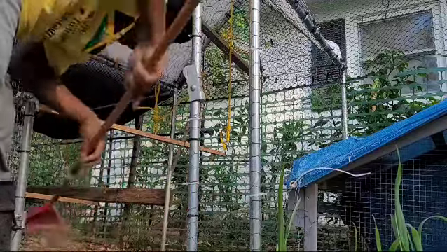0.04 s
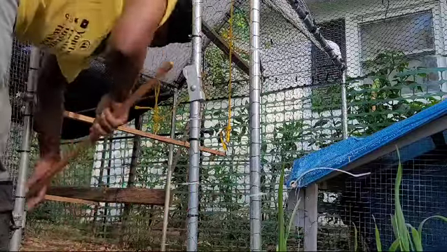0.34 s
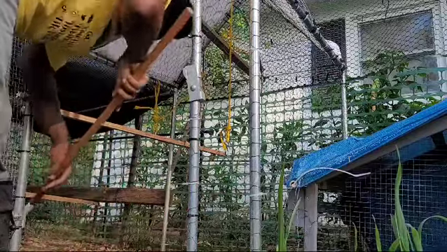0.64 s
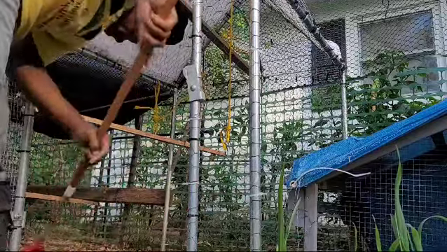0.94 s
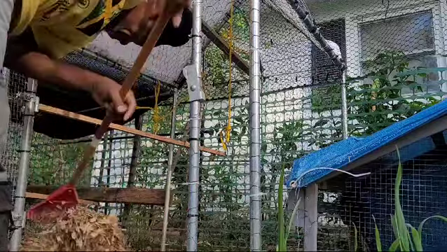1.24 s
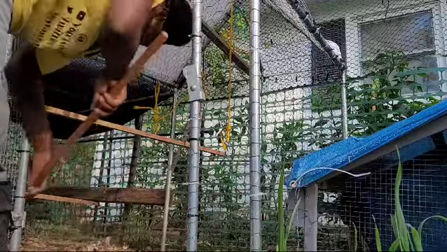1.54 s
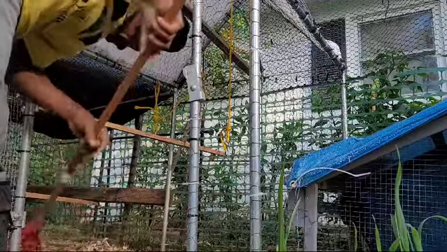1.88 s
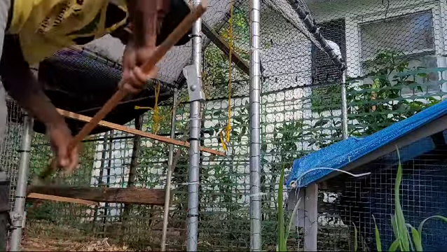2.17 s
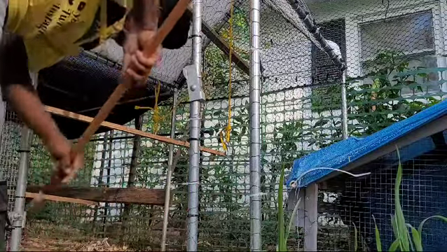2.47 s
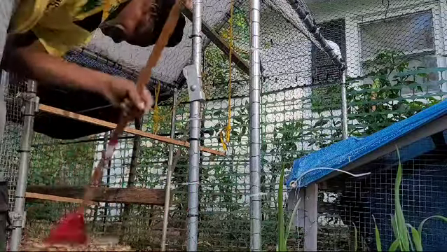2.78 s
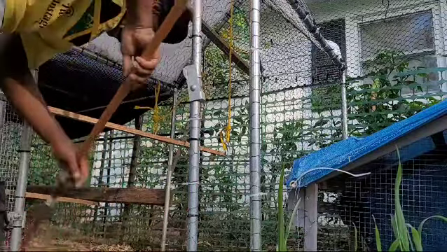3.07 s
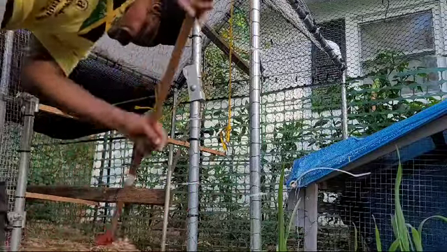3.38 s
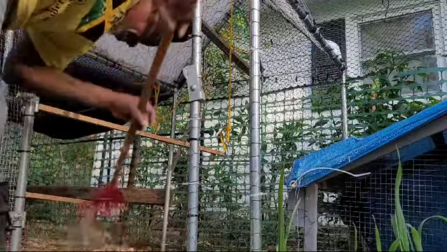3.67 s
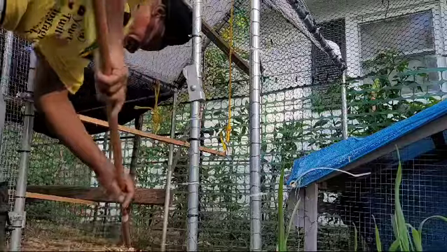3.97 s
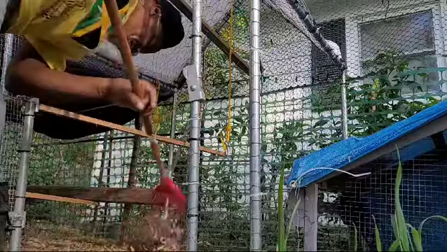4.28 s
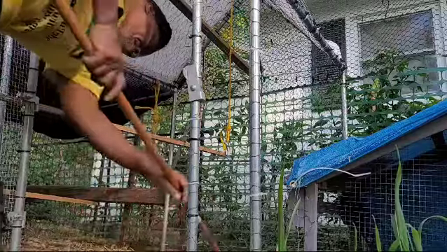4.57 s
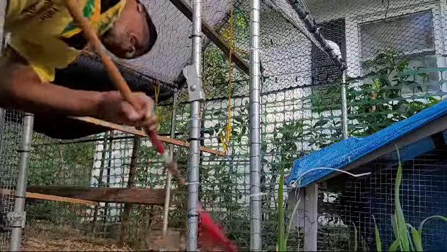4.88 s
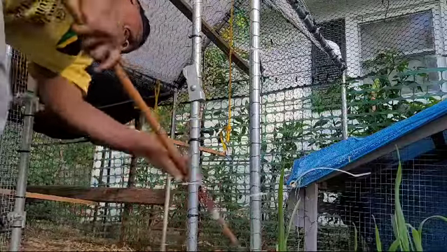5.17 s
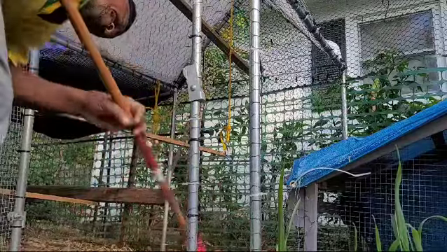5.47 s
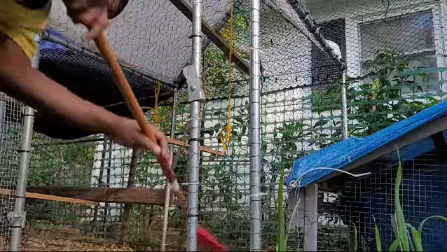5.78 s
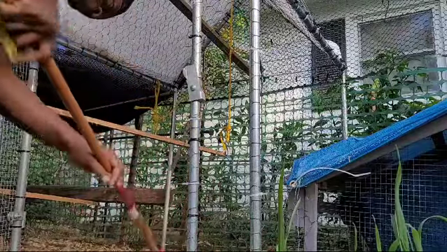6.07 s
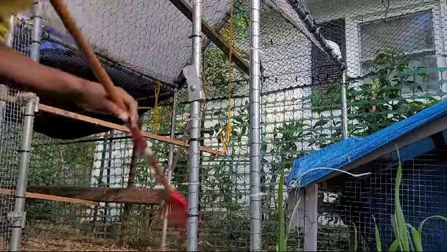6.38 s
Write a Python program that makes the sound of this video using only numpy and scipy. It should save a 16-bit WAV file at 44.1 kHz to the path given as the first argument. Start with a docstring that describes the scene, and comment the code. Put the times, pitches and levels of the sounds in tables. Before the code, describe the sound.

A plastic rake scrapes dry litter across an earth floor in short crunching strokes, with snaps and knocks over a low distant traffic rumble.

```python
"""Raking out a coop

Close by, a plastic rake pulls dry litter across the earth floor of a wire-mesh coop. Its head lands with
a knock, the tines drag through crunching, snapping chips, and flicked chaff patters down.
Behind it distant traffic rumbles, one engine slowly sinks in pitch, a bird gives one short hollow note,
and three faint, very high squeaks come and go."""
import sys
import numpy as np
from scipy import signal
from scipy.fft import rfft, irfft
from scipy.io import wavfile

SR = 44100
rng = np.random.default_rng(int(sys.argv[2]) if len(sys.argv) > 2 else 0)


def master(y):
    """Save y as 16-bit WAV."""
    cut = np.clip(np.atleast_2d(y).T, -1, 1)
    pcm = np.round(cut * 32767)  # scale
    wavfile.write(sys.argv[1], SR, pcm.astype(np.int16))


N = 292455
TIME = np.arange(N) / SR

# Pulls of the rake (start [s], rise [s], hold [s], swell [dB], chip crunch [dB], grit [dB], judder [dB],
# hollow pitch [Hz], hollow hum [dB], tine rasp [Hz], rasp lift [dB], spread of chip sizes [dB])
STROKES = [ (0.945, 0.016, 0.019, 10, -47, -52, -48, 700, -53, 3000, 0, 5),
           (2.521, 0.048, 0.041, 3, -43.5, -57, -59, 760, -49, 3020, 6, 4.5),
           (2.64, 0.046, 0.021, 14, -42.5, -54, -46, 625, -45, 2800, -8, 2),
           (3.21, 0.094, 0.09, 20.5, -27.8, -33, -45, 816, -37.5, 3150, 5.5, 2),
           (3.923, 0.033, 0.01, 19, -55, -36, -38, 866, -45, 3000, 1, 2.5),
           (4.0, 0.078, 0.044, 14, -35, -29, -28.5, 400, -42, 1470, 8, 3.5),
           (4.67, 0.079, 0.039, 21, -33.5, -29.5, -31.5, 520, -30, 2680, -1, 4),
           (5.262, 0.019, 0.022, 15, -33.5, -34, -32, 750, -41, 2380, 9, 1.5),
           (5.319, 0.085, 0.034, 8.5, -28.5, -32, -32.5, 710, -36.5, 2080, 1.5, 4),
           (5.929, 0.032, 0.021, 12, -40.5, -45, -41.5, 577, -51, 1630, 8, 5),
           (6.023, 0.08, 0.039, 14, -38, -35, -34.5, 745, -36.5, 2600, 1, 4.5), ]
# Tone of crushed chips, grit under the tines and the juddering head (frequency [Hz], level [dB])
CRUNCH_EQ = [(900, -24.5), (1600, 1.5), (2300, -1), (3000, 2), (3800, 0), (5200, -4.5), (6700, -17.5),
             (7800, -18.5), (10000, -16), (16000, -23)]
GRIT_EQ = [(350, -19.5), (600, -3), (800, -2), (1000, -0.5), (1270, -14), (1600, -3), (2000, -16.5),
           (3000, -9.5), (6000, -69)]
JUDDER_EQ = [(60, -21), (120, 3.5), (200, 7.5), (300, 0), (450, 6), (580, -6.5), (900, -61), (2000, -32.5)]
# Resonances of the rake's plastic fan (frequency [Hz], width [Hz], lift [dB])
FAN_MODES = [(394, 25, -0.5), (755, 57, 7.5), (1120, 57, 8), (1430, 250, 5.5), (1970, 140, 4.5),
             (2830, 63, 5), (3250, 220, 1.5), (4190, 210, 2), (6600, 770, 10.5)]
# Tines and chips snapping (time [s], level [dB], body [dB], brightness [dB], ring [Hz], ring lift [dB],
# ring width [share of its pitch], t60 [s], first crack against the splinters [dB])
SNAPS = [ (0.2993, -18.5, -5, -50, 3650, 17, .22, 0.011, 0), (.36, -39, -20, 10, 6000, 0, .2, .01, 0),
         (.386, -31.5, 3, -42, 3500, 11, .2, .015, 1), (.5085, -25.5, -19, -23, 2620, 6, .3, 0.026, 0),
         (.5145, -28, -13, -8, 2300, 10, .2, .012, -2), (0.7586, -16, -2, 7, 3500, 4.5, .6, 0.0082, -1),
         (1.6226, -35, -6, -13, 5000, -1, .2, .024, -1.5), (1.8294, -17, -16, -15, 3100, 0, 0.24, 0.012, 1),
         (1.835, -24, -16, -2, 4200, 3, .3, .012, 0), (2.43, -18, 16, -24, 2920, 18.5, .2, 0.012, 1),
         (2.4906, -33, -1, -25, 2970, 9, .2, 0.12, 1), (2.612, -22.5, 12, -32, 2320, 10, 0.18, .02, 3),
         (3.136, -35, -12, -14, 4500, 7, .3, 0.0086, 0), (3.1787, -10, -11, -25, 1600, 14, .4, 0.0085, 1.5),
         (3.185, -27, 1, -22, 5600, 8, .3, .07, -4), (3.214, -23, 0, -24, 1700, 8, .3, .006, -2),
         (3.323, -21, -8, -24, 4000, 7, .3, .01, 2), (3.387, -22, -6, -20, 3100, 5, .3, .006, 4),
         (3.4, -14, 5, -24, 1600, 11, .3, 0.012, 2), (4.061, -16, 11, -15, 1430, 6, .3, 0.022, -2),
         (4.095, -17, 7, -24, 1550, 10, .4, .018, 5), (4.126, -24, 2, -22, 1450, 10, .25, .014, -1),
         (4.444, -50, -12, 8, 4000, 0, .2, .015, -1.5), (4.627, -19.5, 5, -9.5, 2560, 13.5, 0.34, 0.033, 1),
         (4.638, -28.5, 5, -10, 2700, 8, .25, 0.038, 2), (5.096, -34.5, -12, 8, 4000, 2, .2, .035, -1.5),
         (5.136, -32, -22, -19, 3140, 13, .2, .029, -1.5),
         (5.163, -32, -16, -3, 6700, 4, 0.19, 0.033, -1.5),
         (5.26, -21.5, 0, -24, 2180, 14, .2, 0.015, -1.5), (5.274, -17.5, -7, -6, 2530, 8, .2, 0.01, 0),
         (5.297, -15, -2, -24, 2300, 15, .3, .008, -3), (5.363, -15, -2, -22, 2200, 16, .3, 0.009, 0),
         (5.398, -16.5, 15, 2, 746, 11, 0.22, 0.028, -3),
         (5.4374, -11.5, 1, -25, 3370, 9, 0.27, 0.013, 2.5), (5.755, -35, -20, 12, 6000, 0, .2, .01, 0),
         (5.77, -33, -20, 12, 6000, 0, .2, .008, 0), (5.938, -24.5, 5, -39, 2890, 8, 0.22, 0.011, 5),
         (5.988, -34, -12, 0, 4000, 0, .2, .008, 0), (6.0026, -24, -8, -34, 2400, 8, .5, .011, 1),
         (6.128, -23.5, -14, -47, 3080, 9, .25, 0.015, 1), (6.282, -41, -20, 8, 6000, 0, .2, .008, 0),
         (6.607, -34, 9, -40, 2860, 8, .2, 0.0085, 2), ]
# The rake head landing or bumping on the earth (time [s], level [dB], muffling [dB/octave])
KNOCKS = [(3.183, -30, 4), (3.9643, -18, 2.5), (3.981, -28.5, 4), (4.076, -26, 0), (4.63, -6.5, 0),
          (4.782, -26, 0), (5.262, -26.5, 6.5), (5.281, -26.5, 4), (5.343, -20, 2), (5.385, -22, 3),
          (5.399, -21, 0), (5.964, -24, 2)]
# Ring of the rake head (frequency [Hz], level [dB], t60 [s])
HEAD_MODES = [(166, -5, 0.054), (245.5, -8, 0.062), (481, -6, 0.027), (727, -4.5, 0.025), (910, -11, 0.039)]
# Showers of loose chaff (thickest moment [s], rise [s], fall [s], level [dB])
SHOWERS = [ (.358, 0.068, 0.035, -48), (0.518, 0.0088, .06, -40.5), (.58, 0.057, 0.035, -46),
           (.77, 0.0074, 0.071, -48), (1.001, 0.14, 0.39, -51), (1.49, 0.38, .3, -52.5),
           (1.624, 0.019, 0.044, -44.5), (1.769, 0.16, 0.19, -56.5), (1.841, 0.012, 0.09, -40),
           (2.497, 0.04, 0.075, -41), (2.69, 0.22, 0.19, -45.5), (3.182, 0.024, 0.055, -39.5),
           (3.261, 0.038, 0.2, -36), (3.76, 0.25, 0.13, -65), (4.12, 0.11, .13, -46.5),
           (4.54, 0.17, 0.2, -59.5), (4.755, 0.14, 0.11, -36.5), (5.14, 0.13, 0.067, -40.5),
           (5.172, 0.025, 0.085, -46), (5.62, 0.26, 0.14, -57.5), (5.765, 0.044, 0.077, -44.5),
           (5.96, 0.16, 0.083, -46.5), (6.11, .1, 0.14, -49), (6.281, 0.062, 0.042, -51),
           (6.39, 0.069, 0.17, -41.5), (6.509, 0.084, 0.085, -41.5), ]
# Tone of falling chaff (frequency [Hz], level [dB])
CHAFF_EQ = [(800, -10), (2000, 10.5), (3200, 7.5), (6300, 3), (8500, 1.5), (10000, -4.5), (12500, 1.5),
            (16000, 1.5)]
# Tone of road rumble, engine drone and tyre wash (frequency [Hz], level [dB])
RUMBLE_EQ = [(12, -10), (28, -25), (44, -0.5), (62, 4), (90, 1.5), (140, -3), (180, -2), (225, -9.5),
             (280, -20), (600, -55.5)]
DRONE_EQ = [(130, -26.5), (220, 4), (300, -4.5), (380, 1.5), (500, -7), (700, 1), (1500, -69.5)]
TYRE_EQ = [(250, -24.5), (500, -5.5), (690, -1), (850, 2), (1250, -6.5), (1550, -3), (2300, -11),
           (3200, -15.5), (4200, -19), (6700, -24.5), (8000, -35.5), (9600, -55), (12000, -40),
           (16000, -46)]
# Stereo image of the traffic (frequency [Hz], left-right likeness [-1 to 1])
TRAFFIC_LIKENESS = [(60, 1), (130, 0.84), (290, 0.78), (640, 0.27), (1400, -0.31), (3100, 0.16),
                    (15000, -0.27)]
# Firing note of one far engine (time [s], pitch [Hz], level [dB])
ENGINE_NOTE = [(0, 120, -67), (1.35, 117.5, -47), (1.6, 114, -36), (2.3, 109.5, -37), (2.62, 108, -49.5),
               (3.4, 95.6, -37), (3.72, 90, -42), (4.701, 88, -43.5), (6.63, 88, -51)]
# Thin high squeaks (time [s], pitch [Hz], level [dB])
SQUEAKS = [(1.08, 12350, -47.5), (2.17, 12220, -58), (3.565, 12400, -63)]
# Colour of the two microphone ports (frequency [Hz], left minus right [dB])
PORT_BALANCE = [(60, -0.5), (99, -1), (160, -1), (270, -1), (450, -1), (740, 3.5), (1220, 1), (2010, 2),
                (3330, 2), (5500, -1.5), (9080, 1.5), (15000, 2)]


def strokes():
    """Tines crush chips and rub the earth, catching and slipping; the fan judders over a humming hollow."""
    lift_db_per_s, flick_db = 384, 15
    settle_db, settle_db_per_s, settle_s = -15.5, 132, .25
    sag_hz_per_s, hollow_wander = 930, .038
    out, catching, shifting = np.zeros((2, N)), drift(top_hz=100), drift(top_hz=60)
    for (s, rise_s, hold_s, swell_db, crunch_db, grit_db, judder_db,
         hollow_hz, hum_db, rasp_hz, rasp_db, spread_db) in STROKES:
        t = np.arange(round((rise_s + hold_s + settle_s) * SR)) / SR
        to_go = np.maximum(1 - t / rise_s, 0) ** 1.3  # the pull gathers speed quickly, then levels off
        lifted_s = np.maximum(t - rise_s - hold_s, 0)
        catch_db = .35 * np.interp(s + t, TIME, catching)
        pull = amp(catch_db - swell_db * to_go) * signal.windows.tukey(len(t), .03)
        grip = pull * amp(-lift_db_per_s * lifted_s)  # the scrape dies as the rake lifts
        settling = pull * amp(settle_db - settle_db_per_s * lifted_s)  # the chips move on after it
        chips = grains(len(t), per_s=4000, spread_db=spread_db, grain_s=.0003)
        crunch = np.maximum(grip, settling) * amp(crunch_db) * chips
        chip_eq = ringing(CRUNCH_EQ, FAN_MODES + [(rasp_hz, .3 * rasp_hz, rasp_db)])
        add(out, s, crackle(crunch, chip_eq, wet_db=-1, t60=.028))
        # now and then one tine flicks free with a hard click
        flicks = (rng.random(len(t)) < 45 / SR) * rng.uniform(.5, 1, len(t))
        clicks = equalise(flicks * grip * amp(crunch_db + flick_db), chip_eq)
        add(out, s, coop(clicks, wet_db=-4, t60=.03))
        grit = grip * amp(grit_db) * grains(len(t), per_s=3000, spread_db=.5, grain_s=.00027)
        add(out, s, crackle(grit, ringing(GRIT_EQ, FAN_MODES), wet_db=-.5, t60=.012))
        add(out, s, crackle(grip * amp(judder_db), ringing(JUDDER_EQ, FAN_MODES), wet_db=-26, t60=.035))
        # the hollow under the rake sinks in pitch during a pull and wanders as the litter shifts
        hum_hz = hollow_hz - sag_hz_per_s * (t - lifted_s - rise_s - hold_s / 2)
        hum_hz *= 1 + hollow_wander * np.interp(s + t, TIME, shifting)
        hum = resonate(rng.standard_normal(len(t)), hum_hz, width_hz=117)
        hum = unit_rms(resonate(hum, hum_hz, width_hz=190))
        add(out, s, coop(grip * amp(hum_db) * hum, wet_db=-2, t60=.036))
    return out


def snaps():
    """A hard crack with a short splintering tail, coloured by the tine or chip that makes it."""
    rise_s, overtone_ratio = .00068, 1.4
    out, t = np.zeros((2, N)), np.arange(SR // 8) / SR
    for s, db, body_db, bright_db, hz, ring_db, width, t60, crack_db in SNAPS:
        tilt = [(150, body_db - 6.5), (800, body_db + 6), (1500, body_db / 2 + 6), (2900, 0),
                (6600, bright_db / 4), (8500, bright_db / 2 - 5.5), (12000, bright_db),
                (16000, bright_db - 3.5)]
        eq = ringing(tilt, [(hz, hz * width, ring_db), (hz * overtone_ratio, hz * width, .31 * ring_db)])
        splinters = amp(db - 60 * t / t60) * (1 - np.exp(-t / rise_s))
        add(out, s, crackle(splinters, eq, wet_db=4, t60=.05))
        crack = equalise(signal.unit_impulse(len(t)), eq)
        add(out, s + .0007, coop(amp(db + crack_db) * crack / abs(crack).max(), wet_db=-8, t60=.03))
    return out


def knocks():
    """The rake head lands softly and rings for a few cycles; deep litter muffles its higher modes."""
    out, t = np.zeros((2, N)), np.arange(SR // 6) / SR
    for s, db, muffling in KNOCKS:
        ring = np.zeros(len(t))
        for k, (hz, mode_db, t60) in enumerate(HEAD_MODES):
            octaves = np.log2(hz / HEAD_MODES[0][0])
            decay = amp(mode_db - muffling * octaves - 60 * t / t60)
            ring += (-1) ** k * decay * np.sin(2 * np.pi * hz * t)
        ring *= 1 - np.exp(-t / .0015)  # soft attack
        add(out, s, coop(amp(db) * ring / abs(ring).max(), wet_db=-9, t60=.36))
    return out


def showers():
    """Light chaff slides and patters down in clumps: a fine bright rustle that thickens and thins out."""
    out, clumps_db = np.zeros((2, N)), -drift(top_hz=84)
    for s, rise_s, fall_s, db in SHOWERS:
        t = np.arange(-round(rise_s * SR), round(2 * fall_s * SR)) / SR
        thinning_db = 20.5 * np.maximum(-t / rise_s, t / fall_s)
        patter = grains(len(t), per_s=1100, spread_db=4.4, grain_s=.0003)
        patter *= amp(db - thinning_db + np.interp(s + t, TIME, clumps_db))
        add(out, s - rise_s, crackle(patter, CHAFF_EQ, wet_db=3, t60=.04))
    return out


def traffic():
    """Far roads: a lumpy centred rumble, engine drone and a wide tyre wash, each swelling as cars pass."""
    likeness = read(TRAFFIC_LIKENESS, np.fft.rfftfreq(N, 1 / SR))

    def bed(eq, waver_db, steady_db, near_db, near_s, pass_s):
        """Wavering stereo noise: a steady floor plus a vehicle that draws near and recedes."""
        mid, side = rfft(rng.standard_normal((2, N))) * np.sqrt([1 + likeness, 1 - likeness])
        noise = unit_rms(equalise(irfft([mid + side, mid - side], N), eq))
        vehicle_power = amp(near_db) ** 2 / (1 + ((TIME - near_s) / pass_s) ** 2)
        return noise * amp(waver_db * drift(top_hz=9.1)) * np.sqrt(amp(steady_db) ** 2 + vehicle_power)

    rumble = bed(RUMBLE_EQ, waver_db=1.73, steady_db=-39, near_db=-38, near_s=1.82, pass_s=.9)
    drone = bed(DRONE_EQ, waver_db=1.4, steady_db=-52, near_db=-42.5, near_s=.52, pass_s=.62)
    tyres = bed(TYRE_EQ, waver_db=.3, steady_db=-45.5, near_db=-41.5, near_s=1.54, pass_s=1.65)
    return rumble + drone + tyres


def engine():
    """The firing note of a far engine wavers, fades in and out, and sinks."""
    s, hz, db = np.transpose(ENGINE_NOTE)
    firing_hz = np.interp(TIME, s, hz) * (1 + .024 * drift(top_hz=14))
    phase = 2 * np.pi * np.cumsum(firing_hz) / SR
    tone = np.sin(phase) + amp(-20.5) * np.sin(2 * phase)
    fading_db = 3.4 * drift(top_hz=18)
    return unit_rms(tone) * amp(np.interp(TIME, s, db) + fading_db)


def bird():
    """One short, nearly pure note that rises a little."""
    start_s, hz, db, glide_hz_per_s = 4.984, 717, -32, 300
    attack_s, fade_from_s, fade_db_per_s = .0071, .021, 850
    out, t = np.zeros((2, N)), np.arange(SR // 12) / SR
    envelope = np.minimum(t / attack_s, 1) * amp(db - fade_db_per_s * np.maximum(t - fade_from_s, 0))
    tone = unit_rms(np.sin(2 * np.pi * np.cumsum(hz + glide_hz_per_s * t) / SR))
    add(out, start_s, coop(envelope * tone, wet_db=-21, t60=.15))
    return out


def squeaks():
    """Faint, very high pips, each a brief swell."""
    out, t = np.zeros((2, N)), np.arange(SR // 25) / SR
    for s, hz, db in SQUEAKS:
        pip = amp(db) * np.sin(2 * np.pi * hz * t) * np.hanning(len(t))
        add(out, s - t[-1] / 2, np.array([pip, pip]))
    return out


def grains(length, per_s, spread_db, grain_s):
    """Envelope of many tiny fractures of uneven size, each dying away with time constant grain_s."""
    power = amp(2 * spread_db * np.minimum(rng.exponential(1, length), 4))
    breaks = rng.random(length) < per_s / SR
    return unit_rms(np.sqrt(signal.lfilter([1], [1, -np.exp(-1 / (grain_s * SR))], power * breaks)))


def crackle(envelope, eq, wet_db, t60, lead_s=.00017, bounce=.44):
    """Noise bursts reach the left port first, with a floor bounce and a short diffuse tail."""
    envelope = np.pad(envelope, (0, SR // 8))
    direct = envelope * rng.standard_normal(len(envelope))
    decay = amp(-120 / (t60 * SR))  # power left after each sample
    tail_power = signal.lfilter([1 - decay], [1, -decay], envelope ** 2)
    tail = np.sqrt(tail_power) * rng.standard_normal((2, len(envelope)))
    pair = np.array([direct, np.roll(direct, round(lead_s * SR))]) + amp(wet_db) * tail
    pair = np.array([port + bounce * np.roll(port, rng.integers(SR // 800, SR // 250)) for port in pair])
    eq_power = np.mean(amp(2 * read(eq, np.fft.rfftfreq(4096, 1 / SR))))
    return equalise(pair, eq) / np.sqrt(eq_power * (1 + amp(2 * wet_db)) * (1 + bounce ** 2))


def coop(x, wet_db, t60, lead_s=.00023):
    """Sound from the floor reaches the left port first; posts, boards and roof scatter it briefly."""
    t = np.arange(SR // 4) / SR
    taps = rng.standard_normal((2, len(t))) * (rng.random((2, len(t))) < .1) * amp(-60 * t / t60)
    taps *= amp(wet_db) / np.linalg.norm(taps, axis=1, keepdims=True)
    taps[0, 0] += 1
    taps[1, round(lead_s * SR)] += 1
    return signal.fftconvolve(x[None], taps, axes=1) / np.sqrt(1 + amp(2 * wet_db))


def ringing(eq, modes):
    """An EQ curve with resonant bells added (frequency [Hz], width [Hz], lift [dB])."""
    f = np.geomspace(40, SR / 2, num=400)
    lift = sum(db / (1 + (2 * (f - hz) / width) ** 2) for hz, width, db in modes)
    return np.transpose([f, read(eq, f) + lift])


def resonate(x, hz, width_hz):
    """A unity-gain resonance swept along the curve hz."""
    carrier = np.exp(2j * np.pi * np.cumsum(hz) / SR)
    pole = np.exp(-np.pi * width_hz / SR)
    return 2 * (carrier * signal.lfilter([1 - pole], [1, -pole], x / carrier)).real


def equalise(x, eq, size=4096):
    """Minimum-phase filter shaped by an EQ curve."""
    gain_db = np.maximum(read(eq, abs(np.fft.fftfreq(size, 1 / SR))), -100)
    response = np.exp(np.conj(signal.hilbert(np.log(amp(gain_db)))))
    taps = np.fft.ifft(response).real
    return np.apply_along_axis(lambda v: signal.oaconvolve(v, taps)[:len(v)], -1, x)


def drift(top_hz):
    """Random wobble of rms 1, at rates from a tenth of top_hz up to top_hz."""
    t = np.linspace(0, N / SR, num=2000)
    rates = np.geomspace(top_hz / 10, top_hz, num=20)
    waves = sum(np.sin(2 * np.pi * (hz * t + rng.random())) / np.sqrt(hz) for hz in rates)
    return np.interp(TIME, t, unit_rms(waves))


def read(curve, hz):
    """A curve's value at hz, on a log-frequency axis."""
    f, value = np.transpose(curve)
    return np.interp(np.log(hz + 1), np.log(f + 1), value)


def amp(db):
    """Decibels to gain."""
    return 10 ** (np.asarray(db) / 20)


def unit_rms(x):
    """Scales to rms 1."""
    return x / np.sqrt(np.mean(x ** 2) + 1e-20)


def add(mix, s, sound):
    """Lays a stereo sound into the mix at s seconds."""
    part = mix[:, max(round(s * SR), 0):][:, :sound.shape[1]]
    part += sound[:, :part.shape[1]]


def scene():
    """The raking up front, the outdoor bed behind it."""
    rake = (strokes() + snaps() + knocks()) * amp([[.3], [-.3]])  # a little to the left
    return rake + showers() + traffic() + engine() + bird() + squeaks()


def record(dry):
    """Each microphone port adds its own colour, and a steep low-pass trims the very top."""
    lean_db = read(PORT_BALANCE, np.fft.rfftfreq(N, 1 / SR)) / 2
    coloured = irfft(rfft(dry) * amp([lean_db, -lean_db]), N)
    low_pass = signal.firwin(511, cutoff=15950, window=("kaiser", 9), fs=SR)
    return signal.oaconvolve(coloured, low_pass[None], "same")


dry = scene()
out = record(dry)
master(out)
```